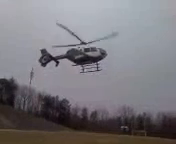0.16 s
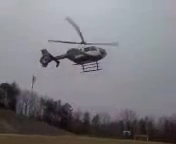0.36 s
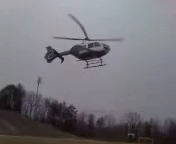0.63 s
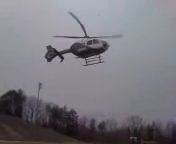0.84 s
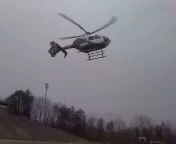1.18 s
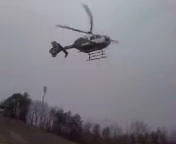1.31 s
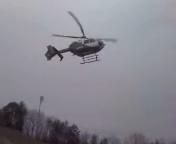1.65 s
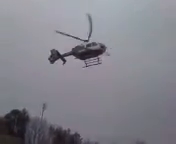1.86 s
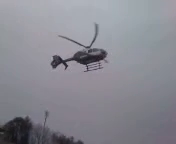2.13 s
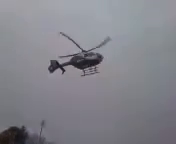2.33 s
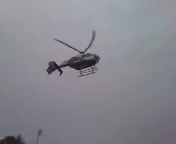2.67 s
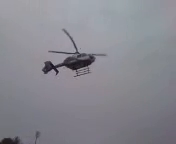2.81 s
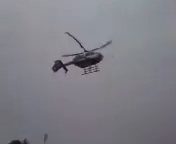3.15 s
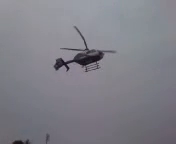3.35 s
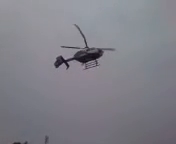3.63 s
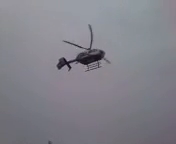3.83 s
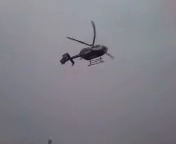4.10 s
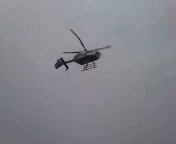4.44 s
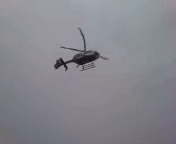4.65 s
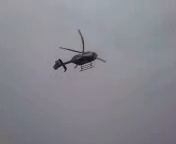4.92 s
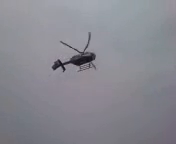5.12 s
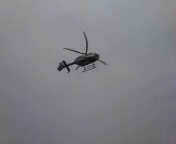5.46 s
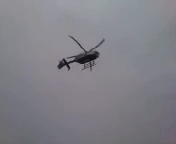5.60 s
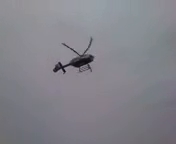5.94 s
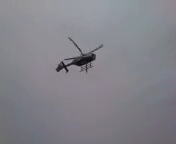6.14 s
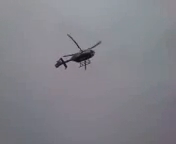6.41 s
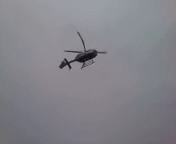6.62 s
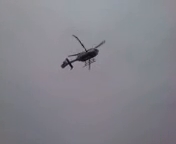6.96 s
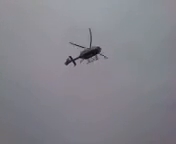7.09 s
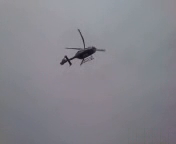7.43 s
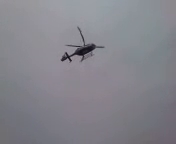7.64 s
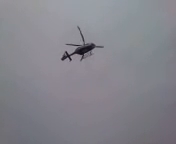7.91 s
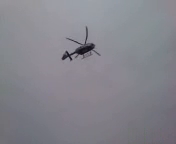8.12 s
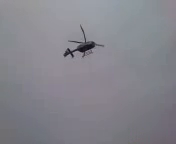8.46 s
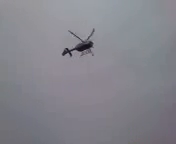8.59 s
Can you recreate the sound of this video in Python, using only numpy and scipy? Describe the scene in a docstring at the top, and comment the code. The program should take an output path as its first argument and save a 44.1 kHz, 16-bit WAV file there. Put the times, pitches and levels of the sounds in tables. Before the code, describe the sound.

Outdoors over an open field, a helicopter already in flight climbs and turns away. Its breathy midrange roar flutters faintly with the rotor, with wavering gear whines in the first four seconds. Uneven wind gusts thump, rumble and rasp on the small camera microphone, strongest from about two seconds onward, with sharp distorted pops. The roar weakens gradually but is still audible at the end. The sound is narrow, dull on top and gritty.

```python
"""Helicopter leaving over a windy field

A helicopter climbs and turns away over a field, heard by a small camera microphone in gusty wind.
Shaped noise makes the roar, throbbing faintly with the rotor; wandering tones mixed with resonant noise
make the gear whines. Gusts are noise, puffs and sharp jolts at the membrane, and the narrow-band
recorder saturates and clips the highest peaks."""
import sys
import numpy as np
from scipy import signal
from scipy.io import wavfile
from scipy.ndimage import uniform_filter1d

SR = 44100
rng = np.random.default_rng(int(sys.argv[2]) if len(sys.argv) > 2 else 0)


def output_pcm(signal):
    """Save a mono or channel-first signal as 16-bit PCM at the path in sys.argv[1].

    Samples are clipped to [-1, 1] before scaling.
    """
    pcm = np.clip(np.atleast_2d(signal).T, -1, 1) * 32767
    wavfile.write(sys.argv[1], SR, np.round(pcm).astype(np.int16))


N = 386757  # samples
HOP, SIZE = 128, 512  # short-time spectra: frame step and window, samples


def gain_of(db):
    """Decibels to gain."""
    return 10 ** (np.asarray(db) / 20)


def evened(x):
    """Scales to rms 1."""
    return x / np.sqrt(np.mean(x ** 2) + 1e-20)


def read(points, hz):
    """Reads a spectrum table on a log-frequency axis."""
    f, value = np.transpose(points)
    return np.interp(np.log(hz + 1), np.log(f + 1), value)


def follow(rows, t):
    """Reads every column of a curve table at the times t."""
    s, *columns = np.transpose(rows)
    return [np.interp(t, s, c) for c in columns]


def grid():
    """Frame times and bin frequencies of the short-time spectra."""
    frame_t = np.arange(N // HOP + 5) * HOP / SR
    bin_hz = np.fft.rfftfreq(SIZE, 1 / SR)[:, None]
    return frame_t, bin_hz


def drift(shape, frames, bins):
    """Random field of rms 1, smoothed over so many frames (columns) and bins (rows)."""
    x = uniform_filter1d(rng.standard_normal(shape), max(1, round(frames)), 1)
    return evened(uniform_filter1d(x, max(1, round(bins)), 0))


def noise(db, lo_hz, hi_hz, shape_db):
    """Noise of spectrum shape_db and level field db; 0 dB means about rms 1 between lo and hi."""
    hz = grid()[1]
    inside = (hz >= lo_hz) & (hz < hi_hz)
    power = np.sum(gain_of(shape_db) ** 2 * inside, 0)
    z = rng.standard_normal(db.shape) + 1j * rng.standard_normal(db.shape)
    z *= gain_of(db + shape_db) / np.sqrt(power * 1.29)
    return signal.istft(z, nperseg=SIZE, noverlap=SIZE - HOP)[1][:N]


def resonate(x, hz, width):
    """Shifts the curve hz down to zero, smooths, and shifts back: a resonance of gain 1."""
    phase = 2 * np.pi * np.cumsum(hz * np.ones(len(x))) / SR
    turn = np.exp(1j * phase)
    r = np.exp(-np.pi * width / SR)
    smoothed = signal.lfilter([1 - r], [1, -r], x / turn)
    return 2 * (turn * smoothed).real


# The helicopter climbing and turning away over the field:
# [t/s, roar level/dB, then the lift/dB of the three resonant bands over the roar's spectrum]
FLIGHT_PATH = [(0, -27, 4, 3, -1), (.3, -28.5, 4, 7.5, 0), (.9, -29.5, 6.4, 7.5, 2),
               (1.25, -28.5, 2, 5.5, -0.5), (1.7, -28, 3.8, 6.5, -3.5), (2.4, -32.5, 6.7, 10.5, 4.5),
               (2.8, -30.5, 9, 4.5, -0.5), (3.2, -30, 4, 2.5, 2), (3.6, -29.5, 4.1, 2, 4.5),
               (4, -33, 3.8, 6.5, 1.5), (4.6, -31, 5.9, 3.5, 3.5), (5, -32, 6.4, -6, 5),
               (5.8, -30, 1.7, 2.5, 5), (6.2, -35.5, 2, 0, 8), (6.5, -33.5, 5.2, 0, 9),
               (7.2, -35.5, 3.8, -3, 7.5), (7.7, -36, 3.8, 2.5, 7), (8.3, -34, 2.6, -6.5, 7),
               (8.77, -36.5, 2.7, 1, 1.5)]
# Spectrum of the roar at the microphone, only its shape counts: [f/Hz, level per Hz/dB]
ROAR_SPECTRUM = [(24, -48), (40, -22.5), (452, -13.5), (725, -6.5), (1010, -12.5), (1390, -3.5), (1720, -9),
                 (1940, -3), (2270, -3.5), (3370, -6), (4440, -32), (5770, -62.5), (9770, -120)]
# Broad humps of the roar that stay in place: [f/Hz, width/Hz, level/dB]
STEADY_HUMPS = [(280, 110, 3.5), (760, 160, 2.5), (3398, 190, 1)]
# Resonant bands of the roar at the microphone, at fixed pitch, whose levels shift during the flight:
# [f/Hz, width/Hz]
RESONANT_BANDS = [(1436, 570), (2140, 250), (2672, 220)]
BAND_WAVER_DB = 1.5  # rms
ROTOR_PER_S, BLADES = 6.5, 4  # turns per second, blades


def roar():
    """Exhaust and blade turbulence, throbbing once a rotor turn and once a blade, stirred by the air."""
    t, hz = grid()
    level_db, *bands_db = follow(FLIGHT_PATH, t)

    def hump(centre_hz, width):
        """Rounded peak of height 1."""
        return 1 / (1 + (2 * (hz - centre_hz) / width) ** 2)

    shape_db = read(ROAR_SPECTRUM, hz) + sum(db * hump(f, w) for f, w, db in STEADY_HUMPS)
    wavers_db = BAND_WAVER_DB * drift((len(RESONANT_BANDS), len(t)), frames=10, bins=1)
    for band_db, (f, w) in zip(bands_db + wavers_db, RESONANT_BANDS):
        shape_db = shape_db + band_db * hump(f, w)
    turns = 2 * np.pi * ROTOR_PER_S * t
    throb_db = .5 * np.cos(turns + 0.4) + 0.51 * np.cos(BLADES * turns)
    streaks_db = 1.26 * drift((len(hz), len(t)), frames=30, bins=3)  # narrow and lasting
    clumps_db = 2.4 * drift((len(hz), len(t)), frames=10, bins=9)  # wide and short
    return noise(level_db + throb_db + streaks_db + clumps_db, 3164, 3573, shape_db)


WHINE_WANDER, WHINE_WAVER_DB = 0.00614, 4.5  # rms share of the pitch, rms level
WHINE_FADE_DB_PER_S = 27.5  # before the start and after the end of a whine
# the longer path smears the tones more and more: share of the pitch per second, loss of the clean part
SMEAR_PER_S, CLEAN_LOSS_DB_PER_S = .006, 5


def whine(start, end, centre_hz, width, level_db):
    """A gear tone, part clean and part blurred by the turbulent path, with wandering pitch and level."""
    t, frame_t = np.arange(N) / SR, grid()[0]
    wander, waver = (np.interp(t, frame_t, row) for row in drift((2, len(frame_t)), frames=12, bins=1))
    smear = np.interp(t, frame_t, rng.standard_normal(len(frame_t)))
    hz = centre_hz * (1 + WHINE_WANDER * wander + SMEAR_PER_S * t * smear)
    blurred = evened(resonate(resonate(rng.standard_normal(N), hz, width), hz, width))
    tone = np.sqrt(2) * np.sin(2 * np.pi * np.cumsum(hz) / SR)
    clean = tone * gain_of(-CLEAN_LOSS_DB_PER_S * t)
    outside_s = np.maximum(np.maximum(t - end, start - t), 0)
    change_db = WHINE_WAVER_DB * waver - WHINE_FADE_DB_PER_S * outside_s
    return (0.78 * blurred + .35 * clean) * gain_of(level_db + change_db)


# Strong whines before the turn away: [t/s, upper relative level/dB, lower relative level/dB]
WHINE_LEVELS = [(0, -15, -30), (0.12, -27.5, -44), (0.25, -25, -22), (0.4, -26.5, -32.5),
                (0.52, -25.5, -32), (0.68, -18.5, -29), (0.9, -38, -16.5), (1.1, -24.5, -33),
                (1.3, -25.5, -37), (1.55, -22.5, -36), (1.68, -24.5, -21), (1.79, -16.5, -19),
                (1.9, -36, -42), (2.3, -32.5, -25.5), (2.65, -24.5, -27), (2.9, -27, -29.5),
                (3.2, -24.5, -31.5), (3.5, -26.5, -30), (4.2, -34, -29)]
# The same two whines, upper then lower: [f/Hz, width of each resonance pass/Hz]
STRONG_WHINES = [(1916, 63), (1438, 92)]
# Faint whines heard for a while:
# [start t/s, end t/s, f/Hz, width of each resonance pass/Hz, relative level/dB]
FAINT_WHINES = [(0, 0.88, 2464, 48, -29), (0, 1.7, 818, 12, -33), (2.748, 3.8, 728, 20, -34)]


def whines():
    """Two strong gear tones until the helicopter has turned away, and a few faint ones."""
    levels_db = follow(WHINE_LEVELS, np.arange(N) / SR)
    end = WHINE_LEVELS[-1][0]
    strong = [(0, end, hz, width, db) for (hz, width), db in zip(STRONG_WHINES, levels_db)]
    return sum(whine(*row) for row in strong + FAINT_WHINES)


# Wind on the microphone: [t/s, level/dB, lift of the rumble/dB, lift of the rasp/dB]
WIND_GUSTS = [(0,-28.5,-13,-2),(.12,-26.5,-4,-1),(.25,-24.5,-20,8),(.43,-28.5,-9,10),(.55,-18,-17.5,-1.5),(.64,-24,-11,3),(.71,-29,-14,8),(.9,-29.5,3,15),(1.05,-21,-5.5,6),(1.19,-29.5,-10,-2),(1.32,-21.5,-11,-5),(1.48,-31,-4,5.5),(1.68,-39,-14,12),(1.82,-20,-16,-0.5),(1.97,-16.5,-6.5,-1.5),(2.2,-19,-1.5,3.5),(2.34,-12.5,2,-4.5),(2.43,-16.5,-2,-1),(2.56,-15.5,6,0.5),(2.68,-31,-10,-3),(2.85,-23,-9,0.5),(3.15,-32.5,-2,5.5),(3.55,-47.5,-9,6.5),(3.7,-26.5,-7,-4.5),(3.78,-21.5,-3,2),(4.05,-16.5,-4,1),(4.3,-15,-4,-4.5),(4.44,-14,-15,-6),(4.55,-16,-3,-2),(4.72,-22,-12,0),(4.85,-18,-3,0),(4.93,-21.5,-13,-4.5),(5.05,-16,-11.5,-1),(5.2,-28,1,-0.5),(5.3,-21,-3.5,-2),(5.5,-40,-11,0),(5.66,-41.5,6,0),(5.76,-23,-17,0),(5.9,-47,-11,9),(6.0,-18,-1,-3.5),(6.15,-23,-8,1),(6.28,-31.5,-5,-2),(6.38,-20,-9,-0.5),(6.48,-21,-13,1.5),(6.6,-18.5,-4,-1),(6.68,-32,-5,1),(6.8,-20,-11,-1.5),(7.02,-16,-6,-5),(7.14,-21.5,-11.5,-2),(7.28,-22,-11,-0.5),(7.42,-17.5,3,-1),(7.53,-29,1,6),(7.65,-22,-10,-7.5),(7.93,-39,-10,8),(8.15,-26,-4,-8),(8.29,-39,-9,-10),(8.45,-30.5,-2.5,1),(8.77,-30.5,-7,-12)]
# Spectrum of the wind at the membrane, only its shape counts: [f/Hz, level per Hz/dB]
WIND_SPECTRUM = [(12, -36.5), (20, -9.5), (104, -0.5), (140, -0.5), (315, -5), (404, -4.5), (1090, -7),
                 (1310, -10), (1970, -13.5), (3390, -26), (4440, -55.5), (5770, -81), (9770, -120)]


def wind():
    """Eddies hitting the membrane: all bands jump together, low and high ends lean by their own amounts."""
    t, hz = grid()
    level_db, rumble_db, rasp_db = follow(WIND_GUSTS, t)
    low_chance, high_chance = drift((2, len(t)), frames=14, bins=1)
    rumble_db = rumble_db + 2.1 * low_chance
    rasp_db = rasp_db + 2.1 * high_chance
    low = 1 / (1 + (hz / 190) ** 4)
    high = 1 / (1 + (750 / (hz + 1)) ** 4)
    shape_db = read(WIND_SPECTRUM, hz) + low * rumble_db + high * rasp_db
    shared_lumps_db = 1.86 * drift((1, len(t)), frames=7, bins=1)
    local_lumps_db = 2.23 * drift((len(hz), len(t)), frames=9, bins=6)
    # the smallest eddies pass in milliseconds: here a frame is one sample
    flutter_db = 1.3 * drift((1, N), frames=99, bins=1)[0]
    gusts = noise(level_db + shared_lumps_db + local_lumps_db, 200, 700, shape_db)
    return gusts * gain_of(flutter_db)


# Single buffets at the microphone: [t/s, relative level/dB, centre f/Hz, length/s (3 times the rise)]
BUFFETS = [(0.093, 1.5, 375, 0.023), (0.453, -4.5, 638, 0.03), (0.519, 1.5, 524, 0.042),
           (0.734, 1, 535, 0.02), (1.227, -8, 950, 0.028), (1.28, -6, 153, 0.034), (1.601, -15, 665, 0.022),
           (1.698, -11, 840, 0.048), (2.253, 4.5, 255, 0.055), (2.687, -11, 514, 0.056),
           (2.78, 0, 740, 0.028), (2.832, -0.5, 296, 0.027), (3.67, -8, 743, 0.031),
           (3.759, -6.5, 137, 0.033), (4.775, -6, 600, 0.069), (5.256, -2.5, 348, 0.016),
           (5.679, -11, 1200, 0.02), (5.735, -2.5, 686, 0.028), (5.965, -1.5, 425, 0.019),
           (6.026, -8, 565, 0.07), (6.143, -6.5, 192, 0.043), (6.356, -5, 342, 0.03),
           (7.113, -0.5, 783, 0.02), (7.573, -5, 650, 0.022), (8.177, -7, 244, 0.019),
           (8.383, -13.5, 277, 0.05), (8.429, -10, 662, 0.034)]


def buffets():
    """Each buffet is a short puff of noise around its centre, quick to rise and slower to fall."""
    out = np.zeros(N + SR)
    puffs = rng.standard_normal((len(BUFFETS), 8192))
    for (s, relative_db, hz, length), puff in zip(BUFFETS, puffs):
        u = np.arange(8192) / SR / max(length, .003)
        body = evened(resonate(resonate(puff, hz, 0.73 * hz), hz, 1.9 * hz))
        swell = 3 * u * np.exp(1 - 3 * u)  # peaks at 1, a third of the length in
        out[round(s * SR):][:8192] += gain_of(relative_db - 14.5) * body * swell
    return out[:N]


# Sharpest pressure jolts of the gusts at the membrane:
# [t/s, peak level before the recorder/dB, length scale/ms]
JOLTS = [(.378, 2, 0.16), (0.762, 3, 0.38), (0.882, 5.5, 0.185), (2.052, 15, 0.13), (2.091, 3.5, 0.085),
         (2.264, -5, 0.21), (2.293, 2, 0.36), (2.329, -12, 0.45), (2.341, 5, 0.68), (2.35, 7, 0.51),
         (2.466, 8, 0.28), (2.481, 6, 0.3), (2.537, 6.5, 0.2), (2.542, 0, 0.19), (4.04, 2.5, 0.31),
         (4.257, 3, 0.21), (4.26, 6.5, 0.19), (4.265, 8, 0.19), (4.277, -2, 0.48), (4.282, 1, .2),
         (4.289, 7, 0.32), (4.296, 10, 0.17), (4.325, 4, 0.23), (4.483, 9.5, 0.173), (4.537, -8, 0.15),
         (4.879, -1, 0.38), (6.046, 12.5, 0.24), (6.374, 8.5, 0.28), (6.578, 2.5, 0.17),
         (8.183, -2.5, 0.28), (8.437, -9, 0.34), (8.548, -8.5, 0.31)]


def jolts():
    """Each jolt is one quick push or pull of the membrane with a shallow swing back on both sides."""
    out = np.zeros(N)
    ms = np.arange(-300, 301) / SR * 1e3
    for (s, peak_db, length_ms), side in zip(JOLTS, rng.choice([-1, 1], len(JOLTS))):
        swing_back = 0.25 * np.exp(-(0.58 * ms / length_ms) ** 2)
        push = np.exp(-(ms / length_ms) ** 2) - swing_back
        out[round(s * SR) - len(ms) // 2:][:len(ms)] += side * gain_of(peak_db) * push / push.max()
    return out


def scene():
    """Helicopter plus wind at one microphone."""
    return (roar() + whines() + wind() + buffets() + jolts())[None]


CODEC_HZ, EDGE_HZ = 4480, 15900  # the recorder's narrow band, then the final band limit


def record(dry):
    """Bass roll-off, soft saturation, narrow band, a hard clip on the highest peaks, the band limit."""
    thin = signal.lfilter(*signal.butter(1, 35, "high", fs=SR), dry)
    soft = 0.77 * np.tanh(1.111 * thin / 0.76)
    skirt = signal.lfilter(*signal.butter(4, 3600, fs=SR), soft)
    narrow_taps = signal.firwin(601, CODEC_HZ, window=("kaiser", 10), fs=SR)
    narrow = signal.oaconvolve(skirt, narrow_taps[None], "same")
    clipped = np.clip(narrow, -.7, .7)
    edge_taps = signal.firwin(511, EDGE_HZ, window=("kaiser", 9), fs=SR)
    return signal.oaconvolve(clipped, edge_taps[None], "same")


dry = scene()
out = record(dry)
output_pcm(out)
```